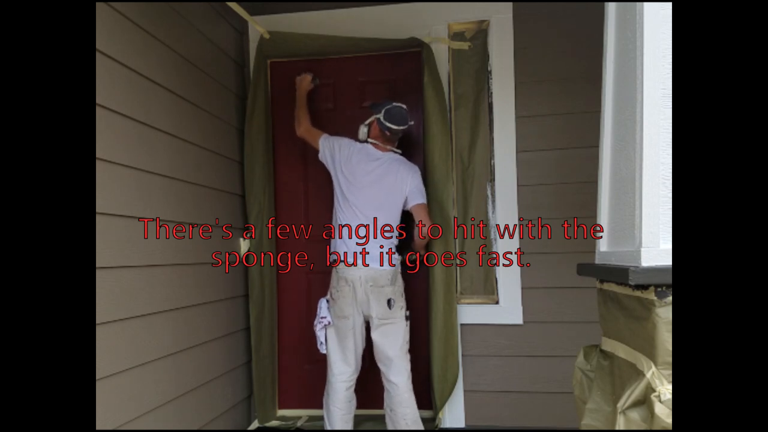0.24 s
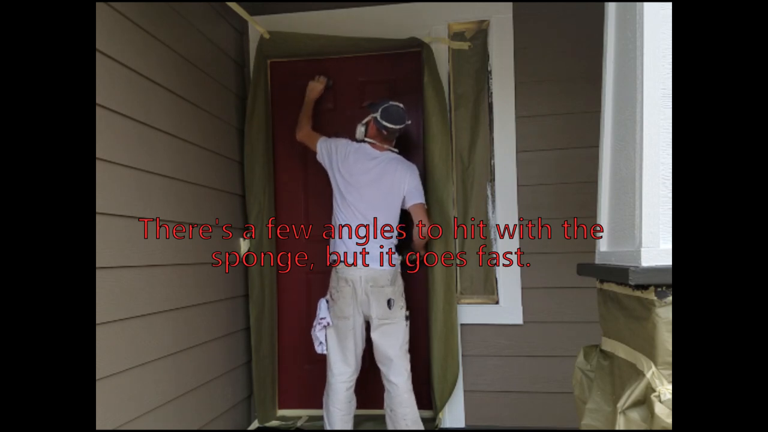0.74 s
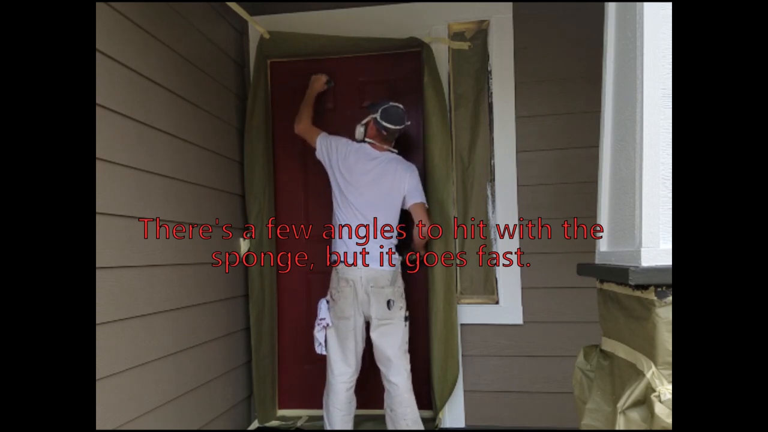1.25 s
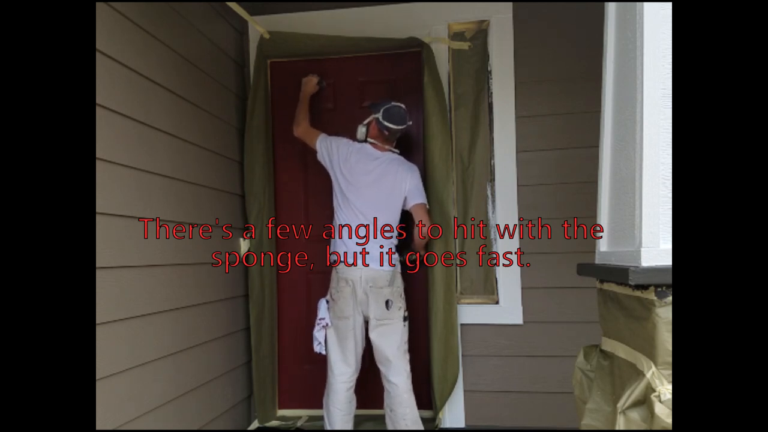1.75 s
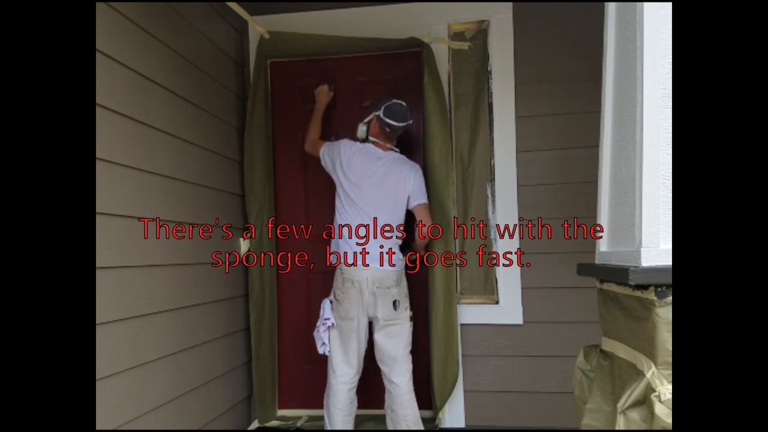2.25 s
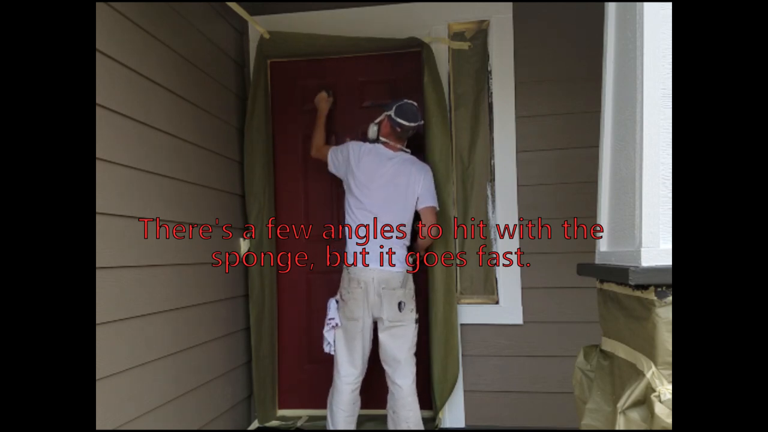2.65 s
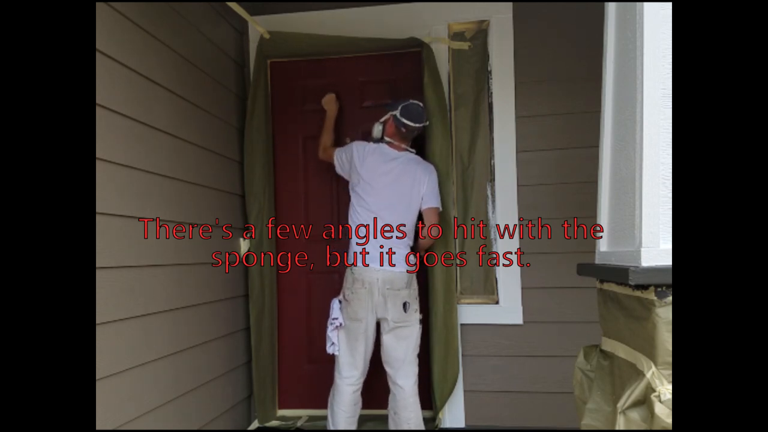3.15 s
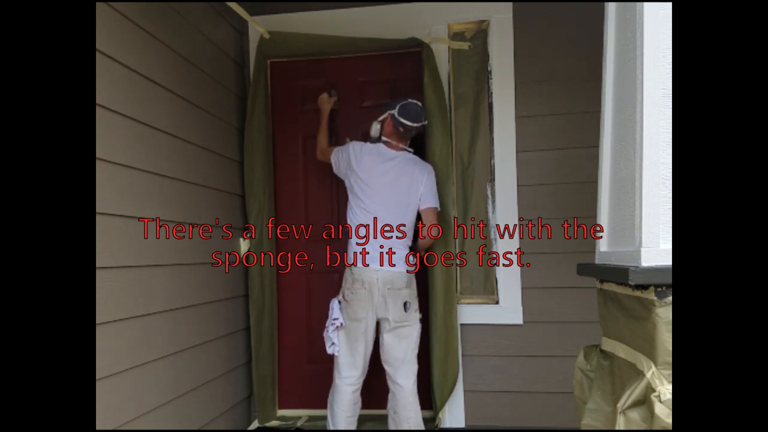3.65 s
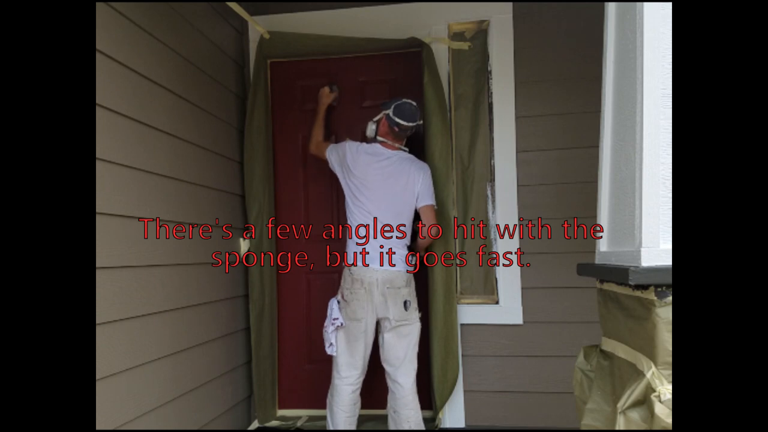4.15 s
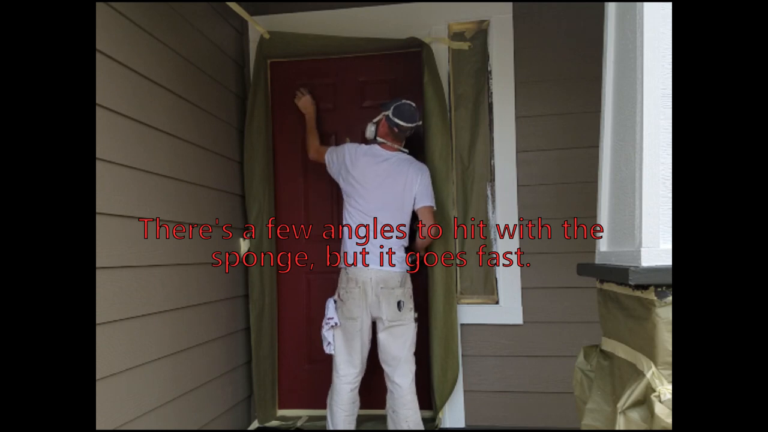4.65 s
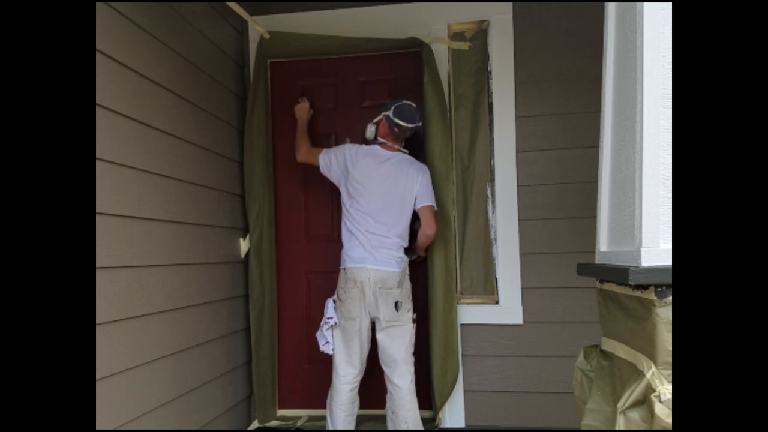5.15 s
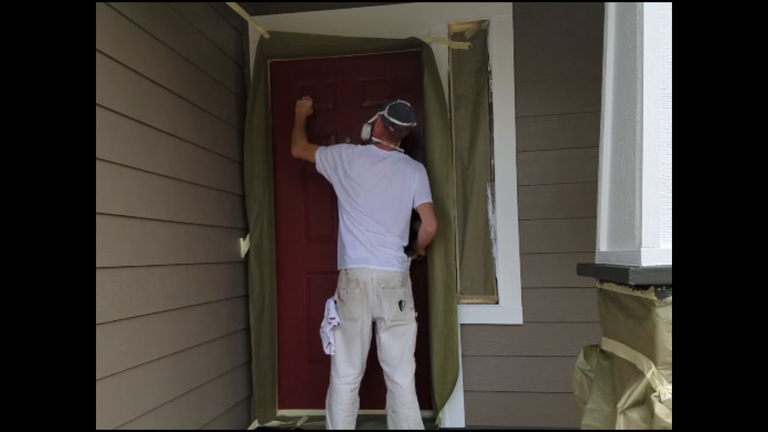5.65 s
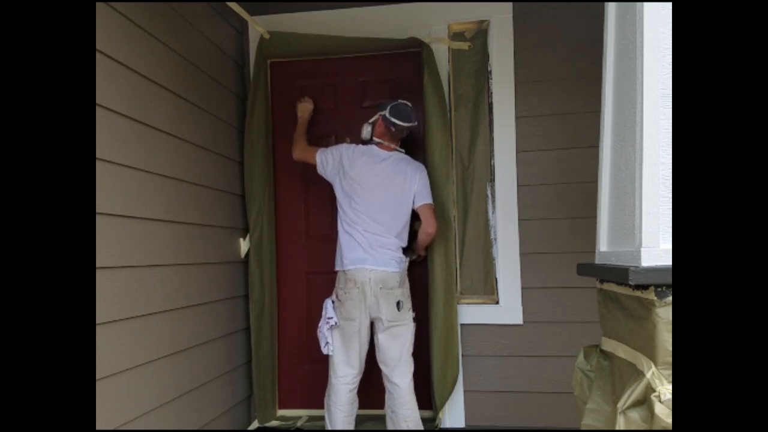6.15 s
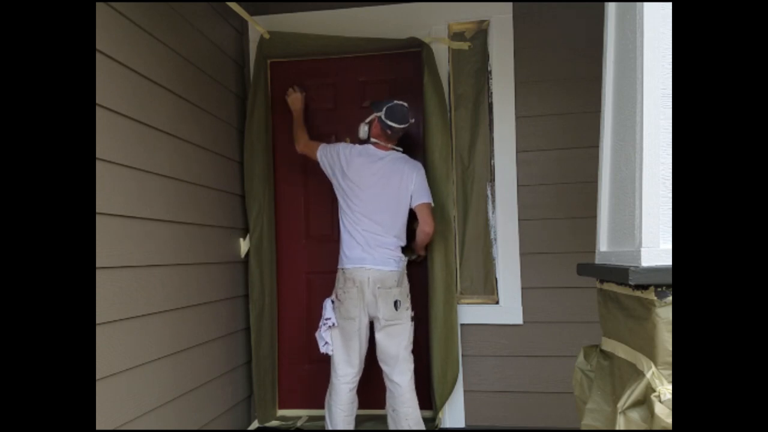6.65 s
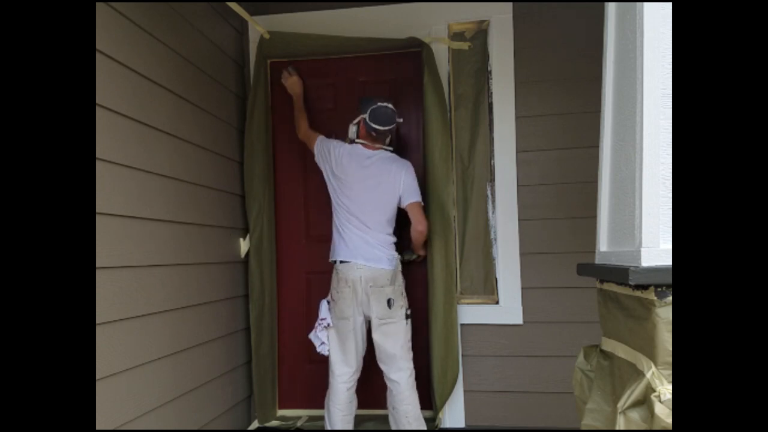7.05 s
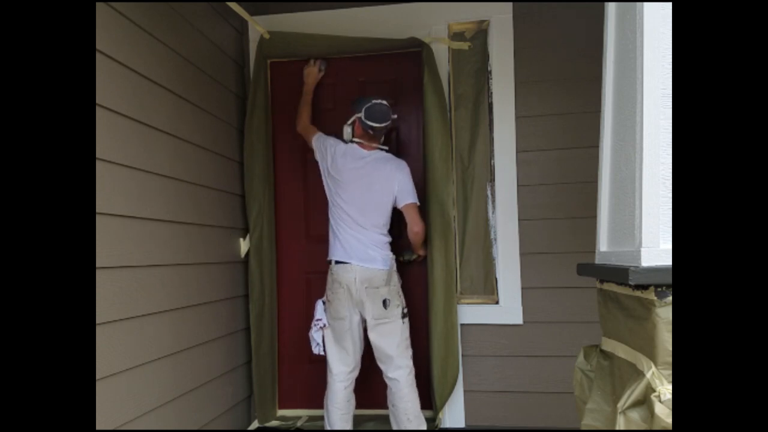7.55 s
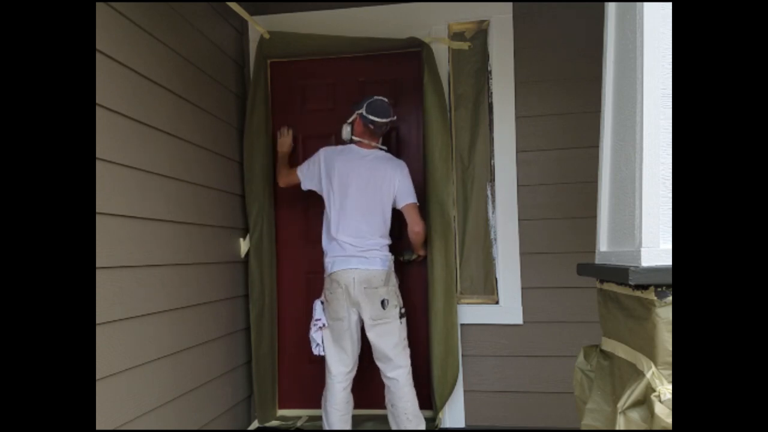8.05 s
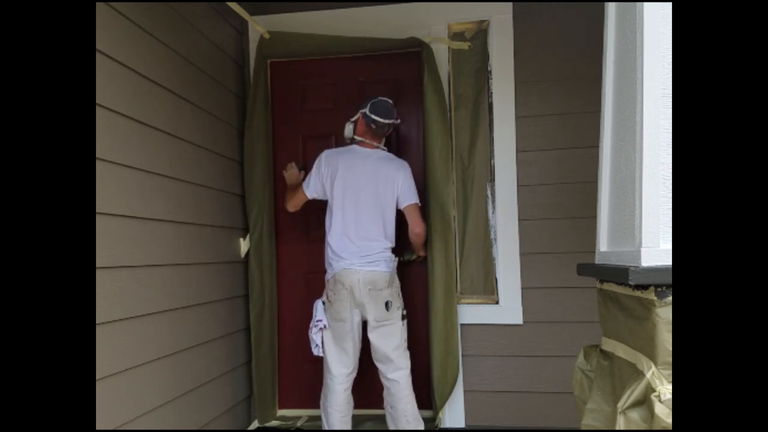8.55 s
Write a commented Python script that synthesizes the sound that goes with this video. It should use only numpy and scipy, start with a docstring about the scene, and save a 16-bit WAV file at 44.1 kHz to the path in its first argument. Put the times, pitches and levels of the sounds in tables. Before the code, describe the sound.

Rapid back-and-forth sanding: thin, high, gritty hisses in a steady rhythm on a steel door, heard from a few metres away on a covered porch in stereo. Low wobbling booms follow the hand's pressure, and tiny creaks pass. After a short gap comes a firm knock, then louder strokes, wind thumping the microphone on the right, and more dull thuds. The last strokes are long and sweeping, over faint traffic murmur.

```python
"""First the hiss of fine grit: a sanding sponge goes back and forth over a painted sheet-metal door on a
porch, a few metres from a stereo microphone. Noise bands of hiss, scratch and rasp follow the hand's speed;
the steel shudders as a wandering low tone and resonant noise, and knocks in its frame ring decaying modes.
Brief noise bands creak, shaped noise murmurs as far traffic, and a breeze rumbles and puffs of wind
swing briefly at the microphone ports."""
import sys
import numpy as np
from scipy import signal
from scipy.fft import rfft, irfft, next_fast_len
from scipy.io import wavfile
from scipy.ndimage import uniform_filter1d, map_coordinates

SR = 44100
rng = np.random.default_rng(int(sys.argv[2]) if len(sys.argv) > 2 else 0)


def bounce(signal):
    """Save signal as a 16-bit WAV file at the path given by the first command-line argument."""
    frames = np.transpose(np.atleast_2d(signal))
    limited = np.clip(frames, -1, 1)
    pcm = np.round(limited * 32767).astype(np.int16)
    wavfile.write(sys.argv[1], SR, pcm)


N = 387631


def amp(db):
    """Decibels to amplitude gain."""
    return 10 ** (np.asarray(db) / 20)


def unit(x):
    """Scaled to rms 1, all channels together."""
    return x / np.sqrt(np.mean(x ** 2) + 1e-20)


def along(points, hz, axis=1):
    """One column of a (f/Hz, value, ..) table, read on a log frequency axis."""
    cols = np.transpose(points)
    return np.interp(np.log(hz + 1), np.log(cols[0] + 1), cols[axis])


def line(s, value):
    """A value per sample, straight between (t/s, value) points."""
    return np.interp(np.arange(N) / SR, s, value)


def wobble(rate):
    """A random curve, straight between knots, rate knots a second."""
    knots = rng.standard_normal(int(N * rate / SR) + 4)
    return map_coordinates(knots, [np.arange(N) * rate / SR], order=1)


def filtered(x, response):
    """x shaped by a real or complex response of frequency."""
    m = next_fast_len(N + SR // 2)
    return irfft(rfft(x, m) * response(np.fft.rfftfreq(m, 1 / SR)), m)[..., :N]


def resonances(modes):
    """Causal response of (f/Hz, width/Hz, level/dB) resonances, summed with alternating sign."""
    def response(f):
        total = 0
        for k, (center, width, db) in enumerate(modes):
            damping = 1j * f * width
            total = total + (-1) ** k * amp(db) * damping / (center * center - f * f + damping)
        return total
    return response


def millisecond_grid():
    """Times in seconds, one per millisecond."""
    return np.arange(N * 1000 // SR + 1) / 1000


def summed(levels_db, rest_db):
    """Rows of levels on the millisecond grid, added as powers over a resting level: dB per sample."""
    power = (amp(levels_db) ** 2).sum(0) + amp(rest_db) ** 2
    return line(np.arange(len(power)) / 1000, 10 * np.log10(power))


def swells(rows, rest_db):
    """(t/s, level/dB, rise/s, fall/s) rows: each climbs to its peak and falls away evenly in dB."""
    s, db, rise, fall = np.transpose(rows)[:, :, None]
    since = millisecond_grid() - s
    return summed(db - 20 * np.maximum(-since / rise, since / fall), rest_db)


# left-right likeness at the microphone: (f/Hz, correlation 0-1)
LIKENESS = [(30, 0.97), (130, 0.97), (290, 0.85), (640, 0.48), (1400, .25), (3000, 0.13)]


def pair(response):
    """Stereo noise of rms 1: alike in the bass, nearly unrelated in the treble."""
    def mid_side(hz):
        turn = np.arccos(np.clip(along(LIKENESS, hz), 0, 1)) / 2
        return response(hz) * np.array([np.cos(turn), np.sin(turn)])
    mid, side = filtered(rng.standard_normal((2, N)), mid_side)
    return unit(np.array([mid + side, mid - side]))


def patchy(noise, patchy_db):
    """Noise of rms 1 with patches of random gain, some 300 Hz by 60 ms."""
    z = signal.stft(noise, nperseg=512)[2]
    field = uniform_filter1d(rng.standard_normal(z.shape[1:]), size=4, axis=0)
    field = uniform_filter1d(field, size=10, axis=1)
    return unit(signal.istft(z * amp(patchy_db * unit(field)), nperseg=512)[1][:, :N])


# course of the far traffic before small wobbles: (t/s, level/dB)
MURMUR_LEVEL = [(0.0, -45), (0.56, -41), (1.52, -41), (2.08, -38), (2.76, -45.5), (3.28, -39.5), (4.1, -42),
                (4.36, -48), (4.53, -36), (5.24, -43), (5.6, -36), (6.17, -41), (7.0, -40.5), (7.17, -34.5),
                (8.1, -42.5), (8.25, -34.5), (8.79, -35)]
# its relative spectrum: (f/Hz, level/dB per Hz)
TRAFFIC_SPECTRUM = [(20, -5.5), (60, -2), (150, -3.5), (300, -16.5), (600, -12), (1200, -18), (2200, -20),
                    (4000, -29.5), (7000, -58), (10000, -31), (16000, -39)]


def traffic():
    """Far behind the porch: a dull, slowly changing murmur of shaped noise."""
    s, db = np.transpose(MURMUR_LEVEL)
    return amp(line(s, db) + 1.36 * wobble(4)) * pair(lambda hz: amp(along(TRAFFIC_SPECTRUM, hz)))


# gusts of a light breeze at the microphone: (peak t/s, level/dB, 20 dB rise/s, 20 dB fall/s)
BREEZE_GUSTS = [(.3, -64, .8, .8), (1.85, -52, .4, .4), (2.4, -45, .3, .3), (5.05, -48, .4, .5),
                (5.72, -44, .3, .3), (5.97, -52, .3, .3), (7.33, -46, .4, .4), (7.55, -52, .5, .5),
                (7.85, -51, .5, .5), (8.15, -56, .6, .6)]
BREEZE_REST_DB = -70  # between gusts


def breeze():
    """Wind on the microphone: lumpy low rumble, unrelated between the ports."""
    spectrum = [(10, -20), (30, -6), (60, -5), (130, -11), (300, -60)]  # (f/Hz, level/dB per Hz)
    rumble = filtered(rng.standard_normal((2, N)), lambda hz: amp(along(spectrum, hz)))
    lumps = amp(4.4 * np.array([wobble(12), wobble(12)]))
    return amp(swells(BREEZE_GUSTS, BREEZE_REST_DB)) * unit(lumps * rumble)


# puffs of wind on one microphone port: (centre t/s, level/dB, f/Hz, port 0 left or 1 right)
WIND_PUFFS = [(2.041, -20.6, 55, 0), (5.197, -6.6, 86, 1), (5.236, -9.6, 65, 1), (5.264, -7.6, 75, 1),
              (5.286, -5.6, 114, 1), (5.304, -0.1, 86, 1)]


def puffs():
    """Each puff pushes one membrane and lets it swing back: a sine under a short bell curve."""
    out, t = np.zeros((2, N)), np.arange(-SR // 20, SR // 20) / SR
    for s, db, hz, port in WIND_PUFFS:
        push = -np.sin(2 * np.pi * hz * t - .3) * np.exp(-(t * hz / 0.55) ** 2)
        out[round(port), round(s * SR) - SR // 20:][:len(t)] += amp(db) * push
    return out


def porch(x):
    """Walls, floor and ceiling answer: a noise tail, shortest in the bass, longer near 600 Hz and above 5 kHz."""
    hz, t, z = signal.stft(rng.standard_normal((2, SR // 2)), SR, nperseg=256)
    t60 = along([(150, 0.091), (600, 0.26), (2000, 0.13), (5000, 0.3)], hz)[:, None]  # (f/Hz, t60/s)
    tail = signal.istft(z * amp(-60 * t / t60), SR, nperseg=256)[1]
    delayed = np.pad(x, (300, 0))[None]  # about 7 ms
    return signal.fftconvolve(delayed, tail / np.linalg.norm(tail[0]), axes=1)[:, :N]


# short creaks of the door: (start t/s, length/s, pitch f/Hz, level/dB before the fade in and out,
# blur 0-1, low tone near a third of the pitch: relative level/dB)
DOOR_CREAKS = [(.10, 0.2, 810, -46, .04, -30), (1.831, 0.056, 750, -34.5, 0.26, -18),
               (3.244, 0.033, 860, -35, 0.54, -22), (3.455, .05, 657, -38, 0.17, -20),
               (4.365, 0.065, 740, -31.5, 0.5, -25), (7.959, 0.024, 565, -33, 0.8, -15),
               (8.212, 0.099, 706, -30.5, 0.4, -6), (8.268, 0.03, 740, -25.5, .45, -7.5)]


def creaks():
    """Brief stick-slip: a blurred band around the pitch, a weaker one an octave up, and a falling low tone."""
    out = np.zeros(N + SR)
    for s, length, hz, db, blur, low_db in DOOR_CREAKS:
        u = np.arange(round(length * SR)) / (length * SR)  # 0 to 1 through the creak
        slips = rfft(rng.standard_normal(SR // 4))
        f = np.fft.rfftfreq(SR // 4, 1 / SR) / hz
        at_pitch = np.exp(-((f - 1) / (.5 * blur)) ** 2)
        octave_up = 0.17 * np.exp(-((f - 2) / (0.73 * blur)) ** 2)
        band = irfft(slips * (at_pitch + octave_up))[:len(u)]
        low = np.sqrt(2) * np.sin(2 * np.pi * np.cumsum(hz / 3 * (1.1 - 0.19 * u)) / SR)
        fade = np.sin(np.pi * np.sqrt(u)) ** 2.2
        out[round(s * SR):][:len(u)] += amp(db) * (unit(band) + amp(low_db) * low) * fade
    return out[:N]


# the door meets its frame: (t/s, relative level/dB, then relative boom, thud and snap level/dB)
FRAME_KNOCKS = [(.670, -26, -18, -7, -9), (1.461, -29, -9, 3.5, -25), (2.101, -22.5, -16, -5, -26),
                (4.397, -18.5, -9, 4, -31), (4.410, -22.5, -21, 6, -24), (4.434, -28, -7, 13, -20),
                (4.473, 0, -26, -3, -15.5), (5.026, -25, -12, -1, -10), (5.104, -28, 0, 6, -18),
                (5.376, -14, -4, 6, -16), (5.399, -11.5, -0.5, 5, -47), (6.058, -32.5, -3, 5.5, -5),
                (6.195, -28, 3.5, 7.5, -18), (6.335, -17, -13, -9, -25), (6.357, -12.5, -5, 2.5, -21),
                (6.649, -23.5, -13, 3, -15), (7.956, -32, -18, -4, -9), (8.758, -14, -20, -4, -22.5)]
# clusters of close modes of the struck door: (nominal f/Hz, relative level/dB, t60/s)
DOOR_MODES = [(66, -16, 0.41), (89, 12.5, .15), (125, -6.5, .2), (166, -11.5, .2), (198.7, -4, 0.3),
              (247.7, -7, 0.34), (313.5, -5.5, 0.32), (432.4, -10, .25), (579, -9.5, 0.27),
              (716, -15, 0.22), (905, -11.5, 0.14), (1172, -7.5, 0.14), (1402, -7.5, 0.11),
              (1670, -8.5, 0.16), (2100, -1.5, 0.04), (2860, -16, 0.061), (3644, -15.5, 0.034)]


def knocks():
    """Each blow rings every cluster of modes anew; its snap sets the crack and the upper modes."""
    out, t = np.zeros(N + SR), np.arange(SR // 3) / SR
    hz, level_db, t60 = np.repeat(DOOR_MODES, 6, axis=0).T[:, :, None]  # six modes a cluster
    upper = np.clip(np.log(hz / 330) / np.log(4.5), 0, 1)
    for s, db, boom_db, thud_db, snap_db in FRAME_KNOCKS:
        luck = rng.standard_normal((len(hz), 3))  # pitch, phase and level of each mode
        upper_db = upper * (snap_db + 10.0)
        reach_db = np.where(hz < 110, boom_db + 0.34, np.where(hz < 225, thud_db, upper_db))
        tones = np.sin(2 * np.pi * hz * (1 + 0.077 * luck[:, :1]) * t + 1.65 * luck[:, 1:2])
        # every mode needs a fraction of its own cycle to build up
        build_up = 1 - np.exp(-t * hz / .35)
        ring = amp(level_db + reach_db + 1.2 * luck[:, 2:] - 60 * t / t60) * tones * build_up
        crack_noise = uniform_filter1d(rng.standard_normal(len(t)), size=5)
        crack = amp(snap_db + 12.0 - 60 * t / 0.062) * crack_noise
        out[round(s * SR):][:len(t)] += amp(db - 11.0) * (ring.sum(0) + crack)
    # the knocks have little sound below about 50 Hz
    return filtered(out[:N], lambda f: (1j * f / (48 + 1j * f)) ** 2)


# pushes of the hand that set the whole leaf booming: (peak t/s, level/dB, 20 dB rise/s, 20 dB fall/s)
HAND_PUSHES = [(0.055, -32.0, 0.045, 0.046), (0.338, -33.6, 0.22, 0.46), (0.858, -42.6, 0.46, 0.188),
               (1.106, -34.4, 0.04, 0.054), (1.273, -37.2, 0.163, 0.04), (1.488, -29.3, 0.322, 0.185),
               (1.681, -20.7, 0.094, 0.119), (2.182, -38.1, 0.441, 0.184), (2.342, -33.6, 0.04, 0.097),
               (2.657, -34.5, 0.238, 0.063), (2.878, -23.1, 0.06, 0.061), (3.157, -28.4, 0.186, 0.077),
               (3.41, -27.4, 0.097, 0.119), (3.685, -33.4, 0.135, 0.04), (4.218, -38.8, 0.46, 0.46),
               (4.493, -19.9, 0.122, 0.08), (4.868, -37.1, 0.46, 0.446), (5.113, -30.3, 0.142, 0.207),
               (5.394, -15.6, 0.086, 0.128), (5.687, -23.9, 0.058, 0.077), (5.95, -36.5, 0.22, 0.129),
               (6.159, -24.5, 0.094, 0.177), (6.362, -16.5, 0.04, 0.145), (6.574, -37.9, 0.278, 0.314),
               (6.825, -32.7, 0.057, 0.061), (7.082, -28.5, 0.051, 0.091), (7.477, -33.6, 0.055, 0.046),
               (8.32, -42.0, 0.46, 0.46), (8.775, -29.7, 0.04, 0.172)]
BOOM_REST_DB = -48  # between pushes
# low resonances of the leaf, then those of its panels: (f/Hz, width/Hz, relative level/dB)
LEAF_MODES = [(68, 41, -2.5), (108, 54, -6.5), (35.2, 30, -16)]
PANEL_MODES = [(120.4, 34, 1), (161.4, 24, -2), (216, 28.4, -1.6), (265, 30, -2.1), (322, 31, -2.2)]
# course of the panel rattle: (t/s, level/dB)
RATTLE_LEVEL = [(0, -48), (.5, -44.5), (1.05, -46), (2.15, -40), (2.89, -46), (3.3, -46), (3.6, -40),
                (3.87, -43), (4.43, -42), (4.92, -41), (5.34, -36), (5.85, -39), (6.31, -41), (6.95, -43),
                (7.13, -35), (7.3, -44), (7.95, -46), (8.25, -41), (8.6, -44), (8.79, -38)]


def shudder():
    """Uneven hand pressure keeps the low bending of the leaf and its panels going."""
    swing_hz = 66 * (1 + 0.0988 * wobble(12))
    swing = np.sqrt(2) * np.sin(2 * np.pi * np.cumsum(swing_hz) / SR)
    push = amp(swells(HAND_PUSHES, BOOM_REST_DB))
    boom = push * (amp(1.8 * wobble(25)) * swing + amp(-8.0) * pair(resonances(LEAF_MODES)))
    rattle = unit(amp(3.3 * wobble(20)) * pair(resonances(PANEL_MODES)))
    return boom + amp(line(*np.transpose(RATTLE_LEVEL))) * rattle


# strokes of the sponge: (start t/s, length/s, speeding-up time constant/s before each layer's share,
# then for hiss, scratch and rasp in turn: peak level/dB, swell from start to end level/dB)
HAND_STROKES = [(0.01, 0.136, 0.01, -22.3, 16.4, -33.7, 10.2, -38.7, 16.6),
                (0.122, 0.141, 0.073, -19.6, -11.3, -32.9, -5.6, -41.4, 5.4),
                (0.268, 0.143, 0.005, -21.8, 15.3, -33.8, 8.1, -39.5, 2.1),
                (0.399, 0.155, 0.054, -21.1, -5.9, -32.2, -3.2, -37.2, 7.2),
                (0.543, 0.137, 0.004, -27.8, 11.1, -38.2, 8.5, -37.9, 7.5),
                (0.68, 0.121, 0.01, -16.8, 21.2, -30.0, 13.7, -30.0, -1.1),
                (0.768, 0.187, 0.09, -20.1, -0.9, -27.6, 7.8, -36.9, 6.5),
                (0.948, 0.132, 0.009, -20.0, 14.0, -33.0, 8.7, -37.3, 6.3),
                (1.076, 0.155, 0.006, -23.2, 13.4, -36.0, 10.6, -41.9, 8.4),
                (1.215, 0.142, 0.007, -18.8, 21.3, -35.2, 16.3, -37.5, 14.1),
                (1.343, 0.156, 0.068, -17.8, -19.4, -32.6, -13.3, -37.3, 7.6),
                (1.48, 0.148, 0.027, -18.9, -1.4, -34.3, 2.6, -36.6, 12.1),
                (1.624, 0.144, 0.006, -18.8, 21.2, -35.2, 14.7, -38.2, 7.8),
                (1.745, 0.164, 0.023, -20.4, 5.6, -36.3, 5.9, -39.8, 7.3),
                (1.899, 0.132, 0.009, -24.8, 11.2, -38.3, 7.7, -40.8, 9.8),
                (2.018, 0.203, 0.086, -21.4, -4.3, -35.2, -7.2, -37.7, 8.3),
                (2.23, 0.2, 0.023, -25.2, -9.7, -36.2, 1.4, -37.2, 17.5),
                (2.435, 0.135, 0.03, -19.3, -6.0, -32.7, -6.0, -34.8, -1.9),
                (2.569, 0.144, 0.05, -19.4, -19.8, -34.5, -8.6, -39.8, 7.1),
                (2.709, 0.133, 0.031, -17.0, -20.0, -29.1, -14.9, -35.3, -2.9),
                (2.829, 0.142, 0.012, -18.6, -5.6, -32.1, -8.7, -37.4, -2.2),
                (2.966, 0.14, 0.026, -15.8, -19.8, -33.3, -11.9, -36.5, 2.9),
                (3.093, 0.143, 0.044, -18.0, -19.1, -32.0, -19.4, -40.6, -3.2),
                (3.236, 0.126, 0.043, -15.9, -20.6, -29.7, -10.2, -37.3, 5.9),
                (3.356, 0.139, 0.074, -18.9, -21.5, -31.9, -15.2, -38.4, 1.8),
                (3.497, 0.143, 0.013, -17.5, -21.8, -32.6, -6.4, -37.9, -2.0),
                (3.612, 0.133, 0.082, -25.9, -13.4, -34.2, -9.2, -36.7, 1.2),
                (3.757, 0.13, 0.007, -26.0, 13.6, -35.4, 5.4, -39.1, -3.4),
                (3.905, 0.127, 0.006, -26.0, 16.2, -38.1, 13.5, -41.2, 10.4),
                (4.017, 0.168, 0.048, -26.0, -8.2, -37.3, -2.6, -38.6, 2.9),
                (4.179, 0.152, 0.01, -20.1, 5.7, -33.4, -7.6, -40.1, -0.6),
                (4.464, 0.121, 0.005, -16.5, 19.8, -30.8, 14.6, -30.1, -2.7),
                (4.559, 0.177, 0.032, -14.8, 12.3, -29.8, 7.1, -32.7, 3.4),
                (4.719, 0.136, 0.009, -13.4, 8.8, -27.1, 2.9, -31.8, 4.6),
                (4.834, 0.135, 0.016, -15.8, 15.3, -30.4, 12.5, -33.2, 12.6),
                (4.955, 0.131, 0.008, -14.2, 10.0, -28.3, 4.5, -31.2, 4.5),
                (5.07, 0.156, 0.009, -16.0, 9.8, -29.5, 2.0, -33.8, -2.9),
                (5.188, 0.197, 0.025, -24.0, -21.0, -41.1, -6.8, -41.2, -0.5),
                (5.356, 0.161, 0.032, -18.6, -20.4, -34.6, -14.4, -35.0, -4.0),
                (5.483, 0.167, 0.01, -21.1, 11.6, -35.4, 10.2, -36.8, 12.6),
                (5.632, 0.146, 0.035, -15.6, -15.0, -31.9, -9.3, -37.3, 7.8),
                (5.756, 0.154, 0.025, -17.2, -21.2, -30.7, -5.1, -34.3, 12.8),
                (5.885, 0.119, 0.012, -18.8, -4.7, -32.7, -2.2, -36.2, -1.9),
                (5.977, 0.154, 0.089, -17.2, 8.9, -33.6, 4.9, -38.0, 14.4),
                (6.13, 0.145, 0.007, -18.1, -3.9, -32.0, -14.2, -37.6, -5.8),
                (6.241, 0.062, 0.041, -33.9, -17.6, -45.8, -4.6, -38.3, 2.2),
                (6.336, 0.224, 0.029, -19.7, 4.7, -31.0, 1.9, -35.6, 1.1),
                (6.552, 0.15, 0.006, -15.5, 17.2, -28.4, 15.2, -32.5, 9.6),
                (6.661, 0.158, 0.015, -25.6, 10.8, -39.1, -13.8, -38.9, -14.3),
                (6.733, 0.178, 0.085, -17.8, -13.6, -31.4, 7.6, -34.6, 17.2),
                (6.884, 0.205, 0.015, -17.3, 12.8, -30.4, 10.8, -32.9, 8.0),
                (7.064, 0.363, 0.015, -17.1, 4.5, -30.0, -0.5, -31.1, 0.9),
                (7.406, 0.307, 0.013, -15.3, 15.4, -30.2, 9.3, -31.3, 11.0),
                (7.656, 0.369, 0.01, -15.7, 10.5, -29.6, 2.5, -33.7, 2.5),
                (7.987, 0.294, 0.026, -16.4, 6.6, -31.1, 10.2, -35.2, 8.7),
                (8.253, 0.336, 0.027, -16.1, 5.4, -29.7, -2.2, -34.2, -1.4),
                (8.556, 0.331, 0.003, -38.2, -17.6, -41.9, 3.5, -35.4, 4.5),
                (8.752, 0.103, 0.01, -16.8, -16.4, -30.7, -1.4, -33.4, -7.1)]
SLOW_DOWN_S = .042  # time constant at the end of a stroke, before each layer's share
# each layer: (power of speed its amplitude follows, shares of the hand's rise and fall times,
# level between strokes/dB)
HISS_LAW, SCRATCH_LAW, RASP_LAW = (2.5, 1.0, 1.0, -46), (1.8, .79, .89, -56), (2.1, .22, .7, -58)


def stroke_levels():
    """The hand speeds up, slides and slows; hiss, scratch and rasp each follow the speed by their own law."""
    start, length, speed_up, *layers = np.transpose(HAND_STROKES)[:, :, None]
    since = np.clip(millisecond_grid() - start, 0, length)
    levels = []
    laws = (HISS_LAW, SCRATCH_LAW, RASP_LAW)
    for peak_db, swell_db, (power, rise, fall, rest_db) in zip(layers[::2], layers[1::2], laws):
        speeding = 1 - np.exp(-since / (rise * speed_up))
        slowing = 1 - np.exp((since - length) / (fall * SLOW_DOWN_S))
        shape_db = power * 20 * np.log10(speeding * slowing + 1e-9) + swell_db * since / length
        levels.append(summed(peak_db + shape_db - shape_db.max(1, keepdims=True), rest_db))
    return levels


# relative spectra of the fine grit and of the coarser grains as each microphone port hears them:
# (f/Hz, left level/dB per Hz, right level/dB per Hz)
GRIT_SPECTRUM = [(6000, -51, -35), (7300, -21, -20.5), (8400, -13.5, -13), (8880, -14.5, -5),
                 (9960, -13, -3.5), (12100, -2, -1.5), (12800, -3, -1), (14300, 3, 1), (15500, 2, 0.5),
                 (16700, -8.5, -10)]
SCRATCH_SPECTRUM = [(3000, -41, -14), (4150, -5, -5), (4330, -4, -4), (5940, -0.5, -3), (6300, -0.5, -3),
                    (7370, -3.5, -5.5), (9200, -18, -16)]
# relative spectrum of the rasp carried by the steel skin: (f/Hz, level/dB per Hz)
RASP_SPECTRUM = [(250, -24), (600, -7), (1050, -7.5), (1300, 0), (1650, 0), (2000, -0.5), (2900, 0),
                 (3600, -4), (5000, -19)]


def sanding():
    """Grit hiss, coarser scratch and the rasp of the steel skin under each stroke."""
    hiss_db, scratch_db, rasp_db = stroke_levels()
    # grains catch in clusters, so the hiss is rough at the millisecond scale
    clusters = amp(0.5 * wobble(900) + 0.88 * wobble(60))
    grit = clusters * rng.standard_normal((2, 2, N))

    def ports(table):
        return lambda hz: amp([along(table, hz, axis=1), along(table, hz, axis=2)])
    hiss = patchy(filtered(grit[0], ports(GRIT_SPECTRUM)), patchy_db=0.8)
    scratch = patchy(filtered(grit[1], ports(SCRATCH_SPECTRUM)), patchy_db=1.5)
    rasp = patchy(pair(lambda hz: amp(along(RASP_SPECTRUM, hz))), patchy_db=1.7)
    # the louder the hiss, the brighter it is
    top = filtered(hiss, lambda hz: np.clip((hz - 10500) / 3000, 0, 1))
    hiss = hiss + (amp(0.23 * (hiss_db + 20.5)) - 1) * top
    return amp(hiss_db) * hiss + amp(scratch_db) * scratch + amp(rasp_db) * rasp


def scene():
    """All sources at the microphone; the porch answers only the knocks and creaks."""
    door = knocks() + creaks()
    low = door + amp(-8.5) * porch(door) + shudder() + traffic()
    low = low * amp([[-.6], [.6]])  # a little stronger on the right, dB
    return low + sanding() + puffs() + breeze()


TOP_HZ = 15760  # band limit


def record(dry):
    """Peaks flatten near full scale; nothing passes above the band limit."""
    soft = dry / (1 + np.abs(dry) ** 8) ** (1 / 8)
    return filtered(soft, lambda hz: hz < TOP_HZ)


dry = scene()
out = record(dry)
bounce(out)
```